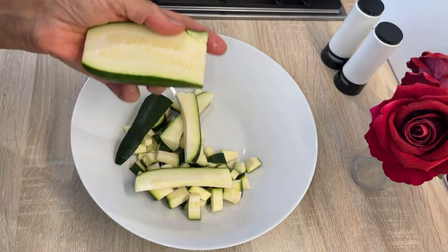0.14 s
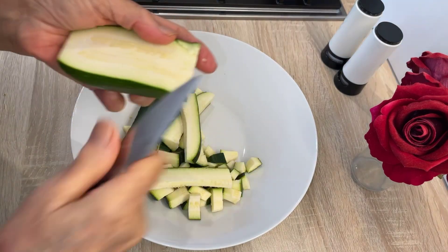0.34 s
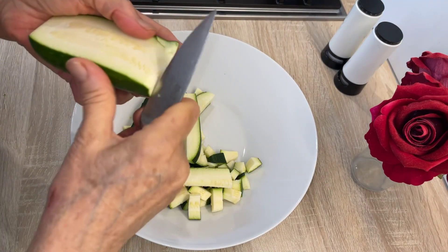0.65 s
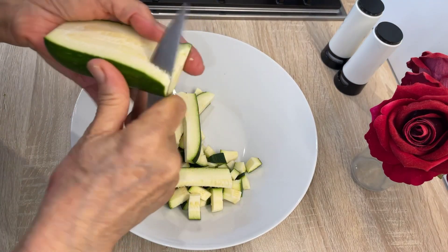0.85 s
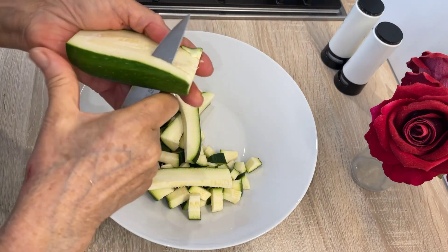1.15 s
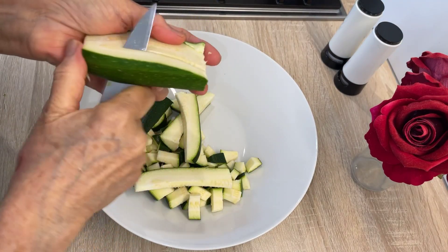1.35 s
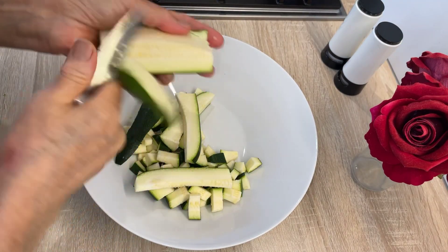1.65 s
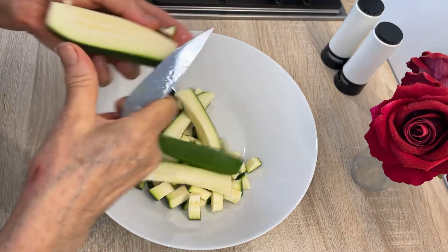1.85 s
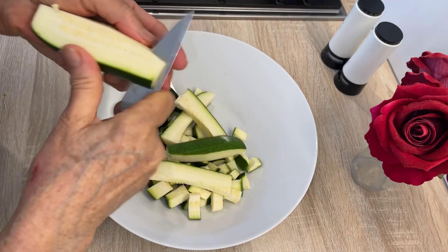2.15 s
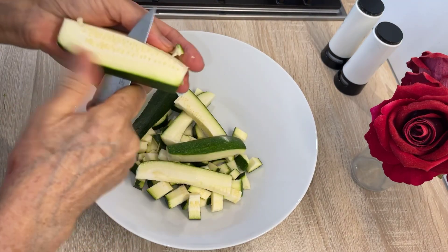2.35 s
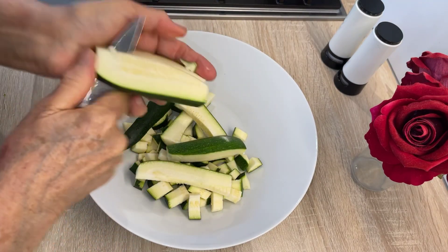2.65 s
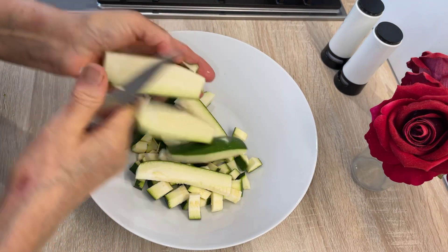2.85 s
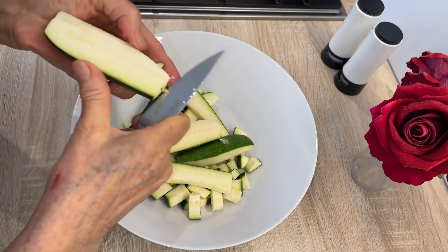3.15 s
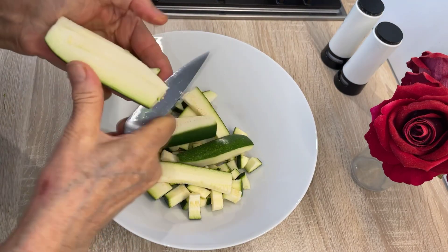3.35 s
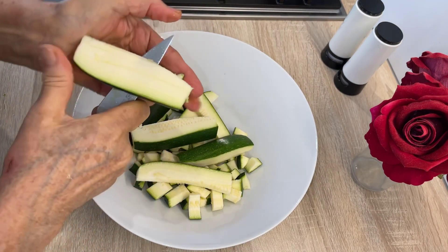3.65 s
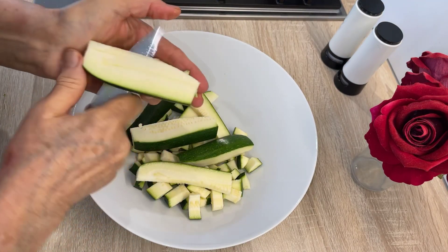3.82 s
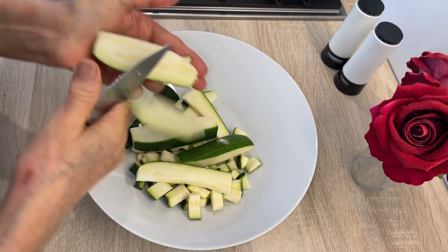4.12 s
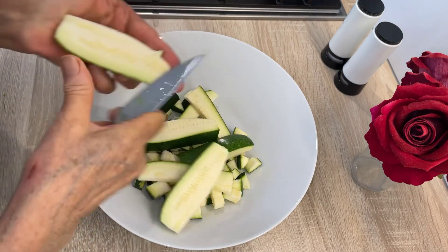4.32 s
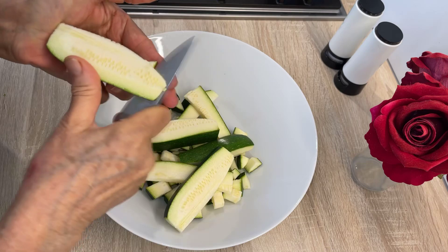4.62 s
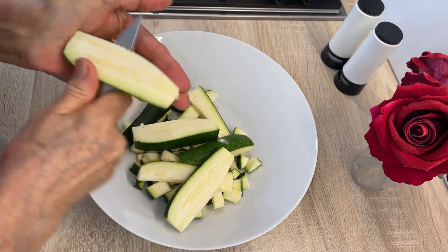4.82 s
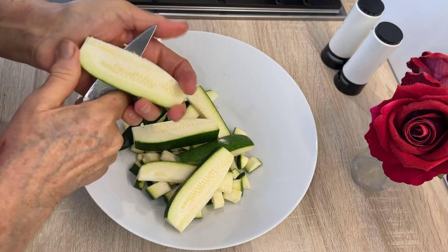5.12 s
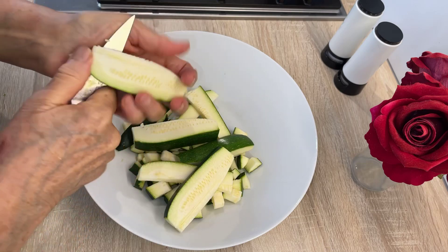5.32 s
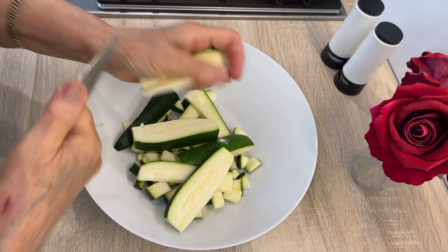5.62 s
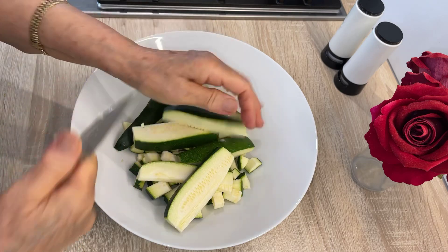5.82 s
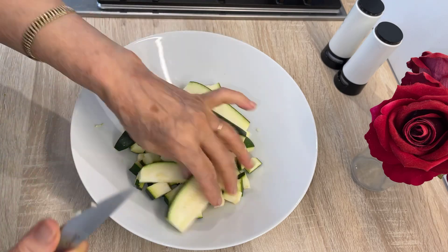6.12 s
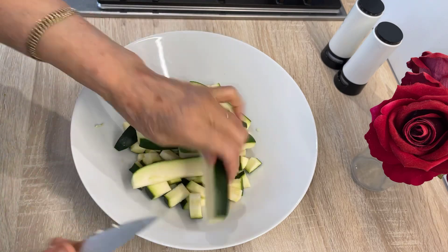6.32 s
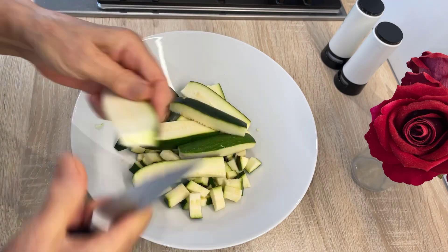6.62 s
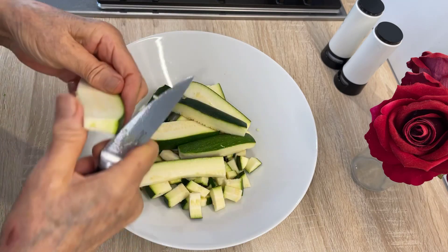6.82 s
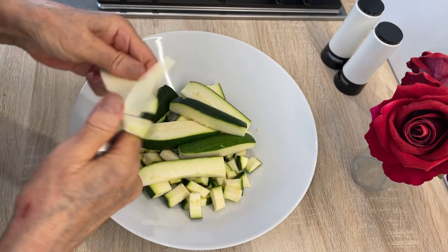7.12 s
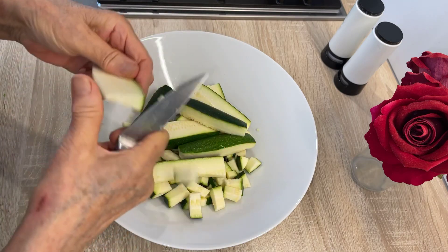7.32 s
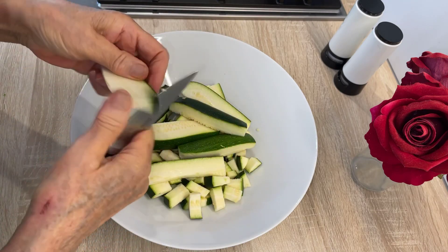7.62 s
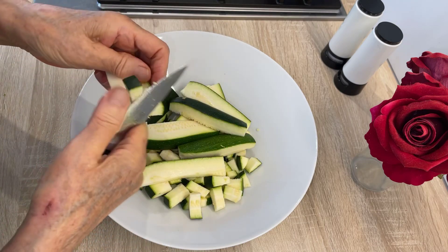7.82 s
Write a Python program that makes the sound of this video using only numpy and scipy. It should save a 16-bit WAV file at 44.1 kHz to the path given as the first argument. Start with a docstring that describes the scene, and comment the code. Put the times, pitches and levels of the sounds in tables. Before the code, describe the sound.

A knife slices a courgette by hand with short, crisp, wet crunches, and pieces drop softly onto a china plate.

```python
"""Slicing a courgette over a plate

A courgette is cut in the hand with a steel knife, over a china plate in a small kitchen.
The blade advances in short slips, each a dense crackle of bursting cells; wet flesh rubs on steel
and fingers. Cut pieces drop on the pile and set the plate ringing faintly; the room rumbles and hums."""
import sys
import numpy as np
from scipy import signal
from scipy.fft import rfft, irfft
from scipy.io import wavfile

SR = 44100
rng = np.random.default_rng(int(sys.argv[2]) if len(sys.argv) > 2 else 0)


def store_wav(level_fs):
    """Save 16-bit WAV to argv[1]."""
    pcm = np.round(np.clip(np.atleast_2d(level_fs), -1, 1) * 32767)
    wavfile.write(sys.argv[1], SR, pcm.T.astype(np.int16))


N = 351036

# Pushes of the knife, each a run of slips: t/s, slip count, slip period/s, sliding share of the period,
# first and last crackle level/dB, first and last crunch level/dB,
# hollow of the cut f/Hz, upper resonance f/Hz, upper resonance level/dB
KNIFE_PUSHES = [(.697, 4, 0.037, 0.7, -47.5, -39, -66.5, -57, 1290, 13500, -4),
                (.869, 4, 0.027, 0.77, -42.5, -37, -59, -48.5, 1250, 13400, -2),
                (1.289, 4, 0.022, 0.59, -29.5, -30.5, -42.5, -40.5, 1320, 4470, -8),
                (1.389, 2, 0.025, 0.58, -33, -33.5, -40, -40.5, 1280, 4470, -8),
                (1.440, 3, .021, 0.66, -35, -37, -54, -60, 1300, 4470, -21),
                (2.089, 4, 0.03, 0.56, -39.5, -35.5, -60, -57.5, 1430, 4170, -16),
                (2.208, 2, 0.026, 1, -31.5, -32.5, -54, -51, 1370, 4140, -21),
                (2.505, 3, 0.018, 1, -38, -35.5, -50.5, -51.5, 1880, 3860, 0),
                (2.617, 2, 0.025, 1, -37.5, -31.5, -54, -49.5, 1680, 4850, 1),
                (3.305, 3, 0.031, 0.53, -35.5, -32.5, -47.5, -56.5, 1720, 6800, -19),
                (3.394, 3, .029, 1, -30, -31.5, -51.5, -45.5, 1730, 6800, -19),
                (3.516, 3, .0178, 0.59, -33.5, -37.5, -44.5, -45, 1810, 7000, -3),
                (3.661, 1, .028, 0.86, -58, -31, -54, -54, 1790, 7000, -10),
                (3.775, 3, .0285, 0.38, -30, -30, -35.5, -43, 1290, 3220, -3),
                (3.851, 3, .019, 1, -35, -28, -54, -65, 1900, 7750, -5),
                (4.528, 9, .0275, .5, -39.5, -34.5, -68, -55, 1720, 2600, -11),
                (4.777, 3, 0.026, 0.78, -32, -33, -50, -47.5, 1730, 2590, -5),
                (5.197, 1, .022, 0.6, -31, -39, -49.5, -51, 1900, 2690, 15),
                (5.224, 2, 0.016, 0.85, -26, -28, -43.5, -57, 1850, 2700, -1),
                (5.414, 1, .018, 0.78, -41.5, -42, -61, -61, 1850, 2800, -9),
                (6.966, 2, .029, 1, -37, -39.5, -61, -69, 1200, 4500, -14),
                (7.414, 2, 0.027, 1, -37.5, -39.5, -66, -63.5, 1230, 3920, 0.5)]
# Thin, bright tone of wet flesh: f/Hz, level/dB
WET_SPECTRUM = [(400, -15), (1300, -14), (2500, -12), (5000, -11.5), (7500, -7), (9000, 0), (11200, -9.5),
                (14000, 0.5), (16000, 3.5)]


def from_db(db):
    """Decibels to gain."""
    return 10 ** (np.asarray(db) / 20)


def rms_one(x):
    """Scale to unit rms."""
    return x / np.sqrt(np.mean(x ** 2) + 1e-20)


def seconds(length):
    """Time axis of a short sound."""
    return np.arange(int(length * SR)) / SR


def add(track, s, sound):
    """Mix a sound into the track at time s."""
    start = max(round(s * SR), 0)
    track[start:start + len(sound)] += sound[:N - start]


def colour(x, spectrum):
    """Minimum-phase EQ with this spectrum; white noise keeps its power."""
    size = 8192
    hz, db = np.transpose(spectrum)
    bins_hz = np.fft.rfftfreq(size, 1 / SR)
    gain = rms_one(from_db(np.interp(np.log(bins_hz + 1), np.log(hz), db)))
    cepstrum = irfft(np.log(gain))
    cepstrum[1:size // 2] *= 2
    cepstrum[size // 2 + 1:] = 0
    return signal.fftconvolve(x, irfft(np.exp(rfft(cepstrum))))[:len(x)]


def resonance(x, hz, width_hz):
    """Two-pole band-pass with gain 1 at its peak."""
    return signal.lfilter(*signal.iirpeak(hz, hz / width_hz, fs=SR), x)


def swell(t, length, rise_s, fall_s):
    """Envelope that rises smoothly, holds until t = length, then dies away."""
    attack = np.sin(np.pi / 2 * np.minimum(t / rise_s, 1)) ** 2
    return attack * np.exp(-np.maximum(t - length, 0) / fall_s)


def ping(t, hz, db, t60):
    """One struck mode: a decaying sine."""
    return from_db(db - 60 * t / t60) * np.sin(2 * np.pi * hz * t)


def bursts(t, per_s, spread_db):
    """Tiny random bursts: clicks of uneven size and either sign, rms 1."""
    sizes = from_db(spread_db * np.clip(rng.standard_normal(len(t)), -2, 2))
    signs = rng.choice([-1, 1], len(t))
    return rms_one(sizes * signs * (rng.random(len(t)) < per_s / SR))


def scatter(clicks, share, decay_s):
    """Blade, hands and plate follow every click with its own few milliseconds of echoes."""
    pole = np.exp(-2 / (decay_s * SR))
    energy = signal.lfilter([1 - pole], [1, -pole], clicks ** 2 + 1e-18)
    echoes = share * np.sqrt(energy) * rng.standard_normal(len(clicks))
    return (clicks + echoes) / np.hypot(1, share)


def reflect(x, share, count=5):
    """Near faces of blade and plate return a few distinct echoes that colour each slip differently."""
    response = np.zeros(len(seconds(.003)))
    echoes = share * rng.choice([-1, 1], count) / np.sqrt(count)
    response[rng.integers(5, len(response), count)] = echoes
    response[0] = 1
    return np.convolve(x, response / np.linalg.norm(response))[:len(x)]


def room_tone(rumble_db=-51.5, hum_db=-64.0, hiss_db=-56.5, hum_hz=283.8):
    """A bed of room rumble, the narrow hum of an appliance fan and faint hiss."""
    # Tone of the rumble and of the hiss: f/Hz, level/dB
    rumble_spectrum = [(20, -27.5), (33, -22), (44, 4.5), (70, -1.5), (100, -4.5), (135, -4.5),
                       (165, -14.5), (230, -15.5), (290, -12), (350, -18), (430, -27.5), (560, -20.5),
                       (1000, -31), (2500, -43.5)]
    hiss_spectrum = [(200, -5), (1500, -7.5), (3000, -10), (6000, -12), (9000, -5.5), (11500, -8),
                     (13000, -2.5), (14200, 4.5), (15200, 11), (16000, -0.5)]
    rumble, fan, hiss = rng.standard_normal((3, N))
    hum = rms_one(resonance(resonance(fan, hum_hz, width_hz=3.2), hum_hz, width_hz=12.7))
    return (from_db(rumble_db) * colour(rumble, rumble_spectrum)
            + from_db(hum_db) * hum
            + from_db(hiss_db) * colour(hiss, hiss_spectrum))


def kitchen_reverb(x, wet_db=-11.0, body_t60=0.4, treble_t60=0.22, rise_s=0.0013):
    """Adds the diffuse echo of the small room; the treble dies first."""
    t = seconds(.6)
    noise = rng.standard_normal(len(t))
    body = signal.sosfilt(signal.butter(1, 5000, fs=SR, output="sos"), noise)
    tail = body * from_db(-60 * t / body_t60) + (noise - body) * from_db(-60 * t / treble_t60)
    tail *= 1 - np.exp(-t / rise_s)
    return x + from_db(wet_db) * signal.fftconvolve(x, tail / np.linalg.norm(tail))[:N]


def worktop_bumps(rise_s=0.0021):
    """The worktop answers a nudge with a short, dull, low note."""
    # Nudges: t/s, level/dB, f/Hz
    nudges = [(.008, -37.5, 112), (0.075, -36, 130), (.11, -33, 115), (0.476, -37, 53.4), (1.711, -30, 64),
              (1.772, -40, 109), (2.871, -37, 89), (4.169, -39, 92), (4.27, -36.5, 118), (5.796, -37.5, 60)]
    out, t = np.zeros(N), seconds(.5)
    for s, db, hz in nudges:
        add(out, s, ping(t, hz, db, t60=0.17) * (1 - np.exp(-t / rise_s)))
    return out


def falling_pieces(slap_t60=0.098, splash_t60=0.049, ring_db=-31):
    """A soft piece lands with a damp slap and a short knock, and wakes the modes of the plate."""
    # Landings on pile and plate: t/s, slap level/dB, splash level/dB, knock f/Hz, knock level/dB
    landings = [(1.698, -49.5, -37, 685, -53), (1.879, -53, -60, 1090, -66), (2.845, -49.5, -40, 835, -47),
                (2.895, -46, -39, 920, -38.5), (4.268, -36, -48, 1236, -34.5),
                (5.798, -49.5, -42, 1110, -56), (5.822, -44.5, -41, 937, -45),
                (5.997, -64, -66, 880, -50.5), (7.337, -49.5, -41.5, 636, -57)]
    # Ring of the china: f/Hz, relative level/dB, t60/s
    plate_modes = [(517, -1, .9), (560, 15, .08), (899, 0, 1.3), (1222, 10, .22), (1351, 4, 1.0),
                   (1480, 19, .12), (1911, -3, 3.5), (2573, -2.5, 1.0)]
    # Tone of the slap: f/Hz, level/dB
    slap_spectrum = [(200, -18), (500, -5.5), (750, -3.5), (1000, -4.5), (1250, -2), (1550, -15),
                     (1900, -5.5), (2600, -12), (4000, -12.5), (9000, -11.5)]
    slap, splash, tones = np.zeros((3, N))
    t = seconds(1.6)
    for s, slap_db, splash_db, knock_hz, knock_db in landings:
        add(slap, s, from_db(slap_db - 60 * t / slap_t60) * rng.standard_normal(len(t)))
        add(splash, s, from_db(splash_db - 60 * t / splash_t60) * rng.standard_normal(len(t)))
        add(tones, s, ping(t, knock_hz, knock_db, t60=.04))
        for hz, mode_db, t60 in plate_modes:
            add(tones, s, ping(t, hz, slap_db + ring_db + mode_db + rng.normal(0, 1), t60))
    return colour(slap, slap_spectrum) + colour(splash, WET_SPECTRUM) + tones


def wet_rubbing(trail_s=0.16, trail_db=-24):
    """Wet surfaces slide and part with a sticky crackle: short rubs, and a trail after each push."""
    # Short wet rubs of flesh against blade or fingers: t/s, length/s, level/dB
    wet_rubs = [(1.003, 0.045, -46), (1.118, 0.037, -50), (1.229, 0.13, -47), (1.752, 0.18, -52),
                (2.035, .02, -39), (2.343, 0.029, -43.5), (3.753, 0.018, -41), (3.93, 0.078, -47.5),
                (4.155, 0.011, -43), (4.85, 0.0078, -39), (5.107, .12, -52.5), (5.345, 0.045, -41.5),
                (5.452, 0.082, -49.5), (5.616, 0.044, -49.5), (6.143, 0.16, -51), (6.942, 0.028, -40),
                (7.385, 0.037, -44), (7.63, 0.11, -52.5)]
    blade_trails = [(s + count * period, trail_s, last_db + trail_db)
                    for s, count, period, _, _, last_db, *_ in KNIFE_PUSHES]
    out = np.zeros(N)
    for s, length, db in wet_rubs + blade_trails:
        t = seconds(length + .08)
        films = bursts(t, per_s=1500, spread_db=4.5)
        add(out, s, from_db(db) * films * swell(t, length, rise_s=0.0045, fall_s=0.02))
    return colour(scatter(out, share=1.7, decay_s=0.0049), WET_SPECTRUM)


def blade_flicks():
    """At the end of a stroke the steel edge scrapes off the skin with a very bright tick."""
    # The blade comes free: t/s, level/dB
    flicks = [(1.680, -27.5), (3.901, -19), (5.483, -29.5), (7.01, -30)]
    # Tone of the steel edge: f/Hz, level/dB
    steel_spectrum = [(1500, -32), (4500, -26), (6200, -16), (7500, -20), (8700, -8), (11200, -19),
                      (12800, -4), (13800, 3.5), (14800, -5), (16000, -3)]
    out, t = np.zeros(N), seconds(.04)
    envelope = swell(t, length=0.0018, rise_s=.0005, fall_s=0.0063)
    for s, db in flicks:
        add(out, s, from_db(db) * rng.standard_normal(len(t)) * envelope)
    return colour(out, steel_spectrum)


def skin_snaps(gain_db=10.0):
    """A tough bit of skin or fibre gives way in one sharp click."""
    # Single snaps: t/s, relative level/dB
    snaps = [(0.8989, -20), (1.3413, -9), (2.0148, -26), (2.6512, -12.5), (3.641, -24), (3.6657, -28),
             (5.1782, -22), (5.2332, -21), (5.9138, -23.5)]
    out = np.zeros(N)
    click = signal.unit_impulse(len(seconds(.03)))
    for s, db in snaps:
        add(out, s, from_db(db + gain_db) * scatter(click, share=1.1, decay_s=0.016))
    return colour(out, WET_SPECTRUM)


def blade_slips(loosening=0.09, mid_push_db=1.0, jitter_s=.0008):
    """The blade sticks and slips at a near-steady rate; slip length and levels glide through each push."""
    for (start, count, period, sliding,
         crackle_first, crackle_last, crunch_first, crunch_last, *resonances) in KNIFE_PUSHES:
        for k in range(count):
            along = k / (count - 1) if count > 1 else .5
            s = start + k * period + jitter_s * rng.standard_normal()
            # slips lengthen as the cut opens
            length = period * np.clip(sliding + loosening * (along - .5), .1, 1)
            press_db = mid_push_db * np.sin(np.pi * along)  # the hand presses hardest halfway
            crackle_db = crackle_first + (crackle_last - crackle_first) * along + press_db
            crunch_db = crunch_first + (crunch_last - crunch_first) * along + press_db
            yield s, length, crackle_db, crunch_db, *resonances


def cutting(crunch_gain_db=5.5, low_cut_hz=1170, lead_s=.004):
    """Each slip tears a sheet of cells: bright crackle, and a crunch that rings in the opening cut."""
    # Tone of the crackle and of the crunch: f/Hz, level/dB
    crackle_spectrum = [(800, -44), (2000, -20), (3500, -13), (5500, -9.5), (7300, -5), (8500, 0),
                        (9700, 0.5), (11200, -10.5), (12300, -4), (13700, 0.5), (16000, -3)]
    crunch_spectrum = [(300, -5.5), (700, 12.5), (1200, 0), (1800, 2), (2200, -3), (2650, 2.5), (3200, -2),
                       (4300, -2.5), (7000, -2), (12000, -14.5)]
    # the narrow cut radiates little below its resonance
    low_cut = signal.butter(4, low_cut_hz, "high", fs=SR, output="sos")
    crackle, crunch = np.zeros((2, N))
    for s, length, crackle_db, crunch_db, hollow_hz, upper_hz, upper_db in blade_slips():
        t = seconds(length + .04)
        envelope = swell(t, length, rise_s=0.0064 + 0.13 * length, fall_s=0.008)
        cells = reflect(bursts(t, per_s=4000, spread_db=5.5) * envelope, share=.9)
        bright = scatter(cells, share=.55, decay_s=.003)
        upper_ring = from_db(upper_db) * resonance(bright, upper_hz, width_hz=0.32 * upper_hz)
        add(crackle, s - lead_s, from_db(crackle_db) * (bright + upper_ring))
        body = signal.sosfilt(low_cut, scatter(cells, share=0.54, decay_s=0.0025))
        hollow_ring = 1.4 * resonance(body, hollow_hz, width_hz=90)
        add(crunch, s - lead_s, from_db(crunch_db + crunch_gain_db) * (body + hollow_ring))
    return colour(crackle, crackle_spectrum) + colour(crunch, crunch_spectrum)


def scene():
    """Knife work and falling pieces echo in the kitchen, over bumps and room tone; mono."""
    foreground = cutting() + wet_rubbing() + skin_snaps() + blade_flicks() + falling_pieces()
    return (kitchen_reverb(foreground) + worktop_bumps() + room_tone())[None]


def record(dry):
    """A steep low-pass trims the very top."""
    cutoff_hz = 15780
    return signal.sosfilt(signal.ellip(12, .1, 80, cutoff_hz, fs=SR, output="sos"), dry)


dry = scene()
out = record(dry)
store_wav(out)
```